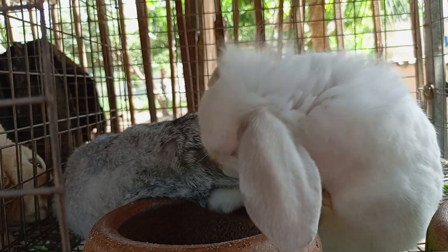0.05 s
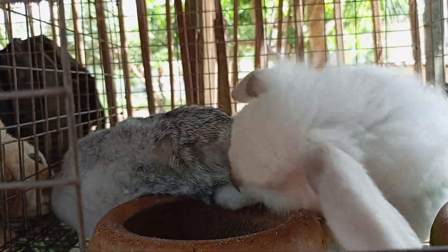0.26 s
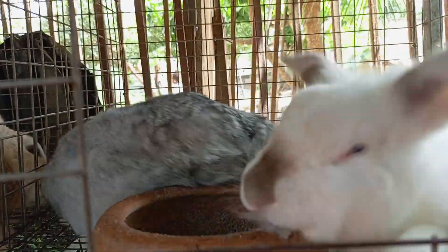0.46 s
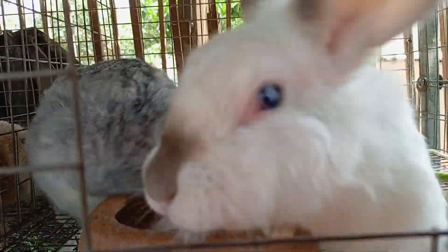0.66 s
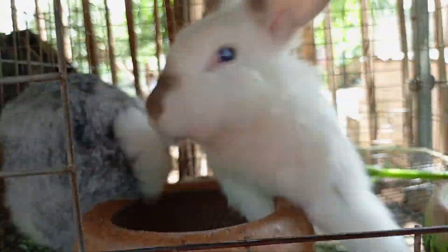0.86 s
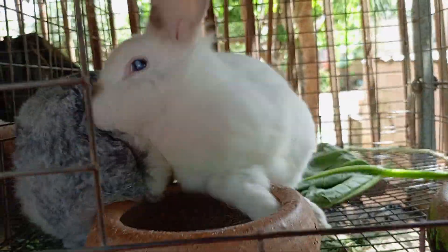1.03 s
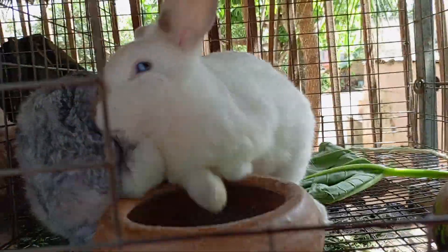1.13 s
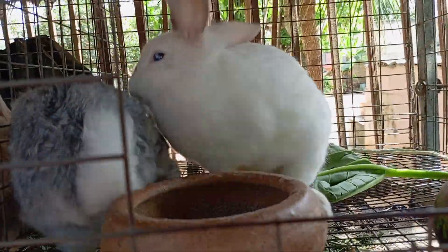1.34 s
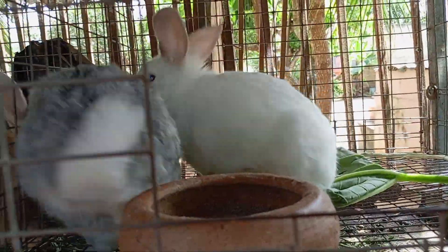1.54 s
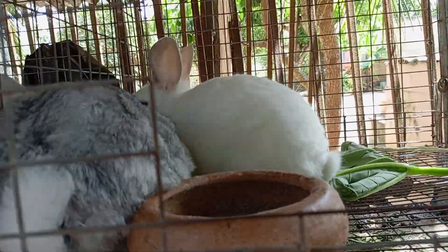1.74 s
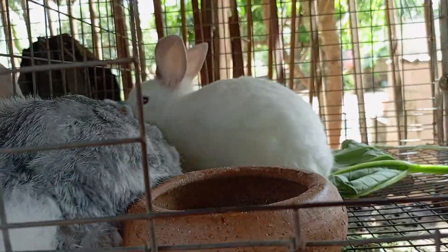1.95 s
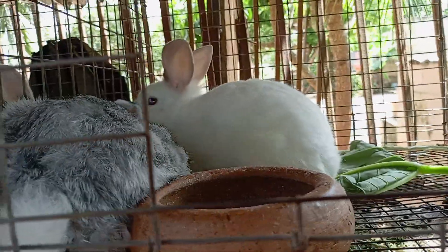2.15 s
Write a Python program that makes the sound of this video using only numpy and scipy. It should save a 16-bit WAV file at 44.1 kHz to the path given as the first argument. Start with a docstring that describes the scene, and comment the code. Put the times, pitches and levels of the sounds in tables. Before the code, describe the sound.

One high, piercing rabbit squeal, followed by faint rustling and rumbling in a cage.

```python
"""A rabbit's single shrill squeal rises, holds and falls away: a harmonic voice, rough at both ends,
with hiss from the narrowed throat. A grunt, pulses filtered by throat resonances, comes just before.
Rabbits are scuffling in a wire cage: friction of fur, paws and claws excites the mesh, and their
shifting weight drives the floor into a rumble. A few soft hoots and a faint whistle sound over a
quiet outdoor background."""
import sys
import numpy as np
from scipy import signal
from scipy.fft import rfft, irfft
from scipy.io import wavfile
from scipy.ndimage import uniform_filter1d

SR = 44100
rng = np.random.default_rng(int(sys.argv[2]) if len(sys.argv) > 2 else 0)


def bounce(signal):
    """Save signal as a 16-bit WAV file at the path given by the first command-line argument."""
    frames = np.transpose(np.atleast_2d(signal))
    limited = np.clip(frames, -1, 1)
    pcm = np.round(limited * 32767).astype(np.int16)
    wavfile.write(sys.argv[1], SR, pcm)


N = 97020
T = np.arange(N) / SR

# fundamental frequency of the squeal (time [s], frequency [Hz])
SQUEAL_PITCH = [(0.184, 1440), (0.192, 1500), (0.196, 1514), (0.206, 2100), (0.212, 2220), (0.232, 2390),
                (0.256, 2450), (0.326, 2941), (0.368, 2737), (0.382, 2776), (0.392, 2756), (0.438, 2786),
                (0.464, 2643), (0.522, 2962), (0.548, 2843), (0.576, 2472), (0.588, 2050), (0.596, 2075)]
# aperiodicity of the voice, capped at 1 in use (time [s], roughness [ratio])
ROUGHNESS = [(.185, 1.1), (.205, 1), (.218, 0.25), (.262, 0), (.28, 0), (.335, 0.07), (.36, 0.04),
             (.435, 0), (.452, .18), (.47, 0), (.505, 0.11), (.535, 0), (.555, .3), (.57, 0.1), (.585, 1.1)]
# envelopes of the first, the second and the upper harmonics (time [s], level [dB])
FUNDAMENTAL_LEVEL = [(0.184, -44), (0.218, -30), (0.254, -26), (0.268, -35), (0.286, -21.5), (0.3, -16),
                     (0.312, -31), (0.326, -18), (0.336, -23.5), (0.38, -18), (0.408, -18.5), (0.494, -11),
                     (0.546, -31.5), (0.552, -21.5), (0.566, -13), (0.584, -29.5), (0.596, -74)]
OCTAVE_LEVEL = [(0.184, -65), (0.214, -30.5), (0.248, -18.5), (0.268, -22), (0.276, -14.5), (0.306, -12),
                (0.372, -34), (0.386, -25), (0.396, -35.5), (0.422, -26), (0.464, -43), (0.5, -16),
                (0.53, -12), (0.54, -33), (0.554, -14), (0.586, -31), (0.596, -49)]
UPPER_LEVEL = [(0.184, -55), (0.206, -26.5), (0.266, -24), (0.282, -34), (0.384, -14.5), (0.408, -26.5),
               (0.418, -15.5), (0.448, -19), (0.458, -29), (0.494, -23), (0.536, -27.5), (0.556, -38),
               (0.568, -19), (0.596, -56.5)]
# harmonics 3 to 7 relative to the upper envelope (gain [dB])
UPPER_OFFSETS = [-2, -15.5, -33.5, -30, -42]
# vocal strain brightens harmonics 4 to 7 (time [s], gain [dB])
STRAIN = [(.19, -12), (.215, -7), (.26, 4.5), (.3, 2), (.35, -4.5), (.44, 3.5), (.48, 2), (.53, 7),
          (.56, -4), (.59, -6)]
# a second, slower vibration that adds sidebands (time [s], rate [Hz], depth [dB])
FLUTTER = [(.36, 920, -51.5), (.388, 720, -29.5), (.405, 520, -25.5), (.43, 440, -27.5), (.45, 420, -45)]
# period doubling: modulation at half the fundamental (time [s], depth [dB])
DOUBLING = [(.185, -8.5), (.205, -21), (.235, -16.5), (.255, -29.5), (.27, -47.5)]
# brief catches of the voice (time [s], duration [s], gain [dB])
CATCHES = [(.263, 0.0081, -10.5), (0.503, 0.013, -7.5), (0.55, 0.0043, 0.5), (0.568, 0.0085, -6)]
def squeal():
    """A harmonic series; modulation adds sidebands, and period doubling adds half harmonics."""
    jitter_depth, shimmer_db, rough_hz = .013, 4.5, 260
    waver_db, waver_hz = 3.0, 75
    pitch = uniform_filter1d(curve(SQUEAL_PITCH), size=220)  # smoothed over 5 ms
    rough = np.clip(curve(ROUGHNESS), 0, 1)
    phase = phase_of(pitch * (1 + jitter_depth * rough * drift(rough_hz)))
    levels = [curve(FUNDAMENTAL_LEVEL), curve(OCTAVE_LEVEL)]
    for k, offset in enumerate(UPPER_OFFSETS, 3):
        strain = curve(STRAIN) if k > 3 else 0
        levels.append(curve(UPPER_LEVEL) + offset + strain + waver_db * drift(waver_hz))
    flutter_hz, flutter_db = curve(FLUTTER), curve(FLUTTER, column=2)
    flutter = from_db(flutter_db) * during(FLUTTER) * np.cos(phase_of(flutter_hz))
    tone = 0
    for k, db in enumerate(levels, 1):
        shimmer = shimmer_db * rough * drift(rough_hz)
        tone += from_db(db + shimmer) * np.sin(k * (phase + flutter))
    tone *= from_db(sum(db * swell(start, length) for start, length, db in CATCHES))
    doubling = from_db(curve(DOUBLING)) * during(DOUBLING) * np.cos(phase / 2)
    voice = np.sqrt(2) * tone * (1 + flutter + doubling) * gate(start=.183, end=.598, edge=.0052)
    throat_low_cut = signal.butter(4, 1590, "high", fs=SR, output="sos")
    return signal.sosfilt(throat_low_cut, voice)


# envelope of the airflow noise (time [s], level [dB])
AIR_LEVEL = [(.18, -49.5), (.21, -47.5), (.25, -49.5), (.28, -38.5), (.33, -42.5), (.37, -52), (.42, -44.5),
             (.455, -36), (.48, -42), (.51, -38), (.54, -41), (.555, -43), (.585, -42.5), (.62, -42)]
# its spectrum (frequency [Hz], gain [dB])
AIR_SPECTRUM = [(300, -31.5), (1500, -31), (2250, -26), (3000, -5.5), (4200, 1), (6500, 2), (8500, -7),
                (11000, -11.5), (12800, -20), (15000, -7.5)]
# raspy cracks in the cry (time [s], duration [s], level [dB])
RASPS = [(0.436, 0.022, -37), (0.49, 0.013, -42), (0.497, 0.024, -30), (0.548, 0.016, -27),
         (.575, 0.014, -40)]
def squeal_air():
    """Turbulence in the narrowed throat: a hiss and short raspy cracks, added in power."""
    steady = from_db(curve(AIR_LEVEL)) * during(AIR_LEVEL)
    cracks = sum(from_db(db) * swell(start, length) for start, length, db in RASPS)
    turbulence = noise() * from_db(2 * drift(rate_hz=400))
    return coloured(turbulence, AIR_SPECTRUM) * np.hypot(steady, cracks)


# course of the grunt (time [s], frequency [Hz], level [dB])
GRUNT_CONTOUR = [(.045, 189.9, -59), (.068, 194.2, -50), (.097, 203.6, -46), (.102, 204.4, -36),
                 (.113, 222, -42.5), (.135, 245.8, -32), (.157, 269.3, -32), (.175, 291, -36.5),
                 (.195, 270, -60.5)]
# spectrum of its rasp (frequency [Hz], gain [dB])
GRUNT_RASP_SPECTRUM = [(150, -15.5), (300, -2), (500, -6.5), (800, 0.5), (8000, 0.5)]
# throat resonances (frequency [Hz], bandwidth [Hz], gain [dB])
FORMANTS = [(222.2, 55, 0.5), (385.5, 130, -7.5), (542, 182, 5), (738.5, 199, 2), (980, 220, -9.5),
            (1690, 260, -24), (3647, 1500, -26)]
def grunt():
    """Source and filter: uneven low pulses and noise excite the resonances of the throat."""
    jitter_depth, rasp_gain = .06, 1.1
    pitch, db = curve(GRUNT_CONTOUR), curve(GRUNT_CONTOUR, column=2)
    cycles = np.cumsum(pitch * (1 + jitter_depth * drift(rate_hz=100))) / SR
    pulses = unit_power(np.diff(np.floor(cycles), prepend=0))  # one pulse a cycle
    rasp = rasp_gain * coloured(noise(), GRUNT_RASP_SPECTRUM)
    return resonate(pulses + rasp, FORMANTS) * from_db(db) * during(GRUNT_CONTOUR)


# strokes of fur and paws (time [s], attack [s], decay [s], level [dB])
BRUSH_STROKES = [(.0, .03, 0.12, -58), (.11, 0.093, 0.023, -50), (.59, 0.047, 0.064, -40),
                 (.775, 0.019, 0.14, -46.5), (1.014, 0.0056, 0.062, -51), (1.063, 0.023, 0.019, -45.5),
                 (1.11, 0.0056, 0.067, -54.5), (1.25, .02, .06, -58.5), (1.33, 0.0078, 0.05, -49),
                 (1.451, 0.034, .07, -51.5), (1.59, 0.024, 0.059, -46.5), (1.75, 0.034, 0.16, -56.5),
                 (1.868, 0.016, 0.032, -48.5), (2.12, .02, 0.019, -68)]
# spectrum of their friction (frequency [Hz], gain [dB])
BRUSH_SPECTRUM = [(300, -15), (1000, -6), (2000, -18.5), (3000, -6), (4300, -4.5), (5200, -12), (6400, -3),
                  (8200, -8), (10800, -11.5), (12800, -24), (15000, -11)]
# modes of the mesh (frequency [Hz], bandwidth [Hz], gain [dB])
WIRE_MODES = [(4080, 260, -5.5), (5950, 100, 1.5), (6360, 140, -3.5), (7050, 150, -4), (10100, 140, -11.5)]
def brushes():
    """Sliding friction of fur and paws, with the ringing of randomly excited wire modes."""
    rustle = coloured(friction(), BRUSH_SPECTRUM)
    wires = from_db(-3.5) * resonate(noise(), WIRE_MODES)
    return stroke_envelope(BRUSH_STROKES) * unit_power(rustle + wires)


# scrapes and ticks of claws (time [s], attack [s], decay [s], level [dB])
CLAW_STROKES = [(.1, 0.00092, 0.0015, -48.5), (.137, .001, .005, -52), (.158, .007, 0.018, -36),
                (.62, 0.024, 0.034, -42.5), (.99, 0.00067, 0.0091, -60), (1.113, .003, 0.038, -50),
                (1.333, 0.0051, 0.031, -64), (1.593, 0.0027, 0.014, -46)]
# their spectrum (frequency [Hz], gain [dB])
CLAW_SPECTRUM = [(1500, -3), (4500, -12.5), (6200, 5.5), (7300, 2.5), (8300, -7.5), (10500, 3.5),
                 (12500, -21.5), (15000, -12)]
def scrapes():
    """Friction transients: claws catch on the wire in bright bursts of noise."""
    return stroke_envelope(CLAW_STROKES) * coloured(friction(), CLAW_SPECTRUM)


# envelope of bodies shoving together (time [s], level [dB])
SHOVE_LEVEL = [(0, -66), (.3, -70), (.42, -65), (.46, -58), (.54, -65.5), (.575, -44.5), (.64, -39.5),
               (.72, -46.5), (.83, -44), (.92, -50), (1.08, -52), (1.22, -52), (1.42, -57.5), (1.58, -61.5),
               (1.615, -45.5), (1.69, -48), (1.75, -53), (1.83, -57.5), (1.9, -58), (2.0, -63.5),
               (2.2, -64.5)]
# spectrum of their rubbing (frequency [Hz], gain [dB])
SHOVE_SPECTRUM = [(30, -36), (100, -9.5), (250, 0.5), (500, 0.5), (800, -7), (1300, -7), (2500, -15),
                  (5000, -19.5), (12000, -41)]
def shoving():
    """Friction of fur on fur: dull noise whose level flickers by about 1 dB."""
    return coloured(noise(), SHOVE_SPECTRUM) * from_db(curve(SHOVE_LEVEL) + drift(rate_hz=34))


# envelope of the floor's vibration (time [s], level [dB])
RUMBLE_LEVEL = [(0, -56), (.3, -64), (.54, -73), (.58, -44.5), (.64, -38.5), (.72, -41), (.79, -43.5),
                (.92, -45), (1.0, -48.5), (1.1, -46.5), (1.24, -59.5), (1.38, -53), (1.58, -60),
                (1.69, -47.5), (1.76, -46.5), (1.82, -55), (1.9, -51.5), (1.98, -56.5), (2.2, -60)]
# spectrum of its broadband part (frequency [Hz], gain [dB])
RUMBLE_SPECTRUM = [(20, -44.5), (35, -29), (52, -21.5), (85, 6.5), (125, 3.5), (160, -2.5), (250, 3.5),
                   (400, -6), (900, -41.5)]
# modes of the cage floor (frequency [Hz], bandwidth [Hz], gain [dB])
FLOOR_MODES = [(123.5, 11, 0), (230.6, 14, -3.5)]
def floor_rumble():
    """Forced vibration: shifting weight shakes the cage floor, which rings in two low modes."""
    push = coloured(noise(), RUMBLE_SPECTRUM)
    ring = from_db(0.5) * resonate(noise(), FLOOR_MODES)
    return unit_power(push + ring) * from_db(curve(RUMBLE_LEVEL))


# soft hoots (time [s], duration [s], frequency [Hz], level [dB])
HOOT_NOTES = [(0.052, 0.053, 262, -45.5), (0.231, 0.023, 257, -48.5), (0.944, 0.055, 285, -52.5),
              (1.123, 0.056, 290, -52.5), (1.283, 0.027, 292, -50), (1.444, 0.041, 292.6, -47)]
# spectral envelope of their harmonics (frequency [Hz], gain [dB])
HOOT_SPECTRUM = [(260, -15.5), (520, -14), (580, 1), (780, 2), (880, 0.5), (1150, -21.5), (1500, -22.5),
                 (2500, -50)]
def hoots():
    """Harmonic notes, strongest in the second and third partials; frequency jitter makes them hoarse."""
    jitter = 1 + 0.031 * drift(rate_hz=120)
    spectrum_hz, spectrum_db = np.transpose(HOOT_SPECTRUM)
    out = 0
    for start, length, hz, db in HOOT_NOTES:
        phase = phase_of(hz * jitter)
        gains = from_db(np.interp(hz * np.arange(1, 6), spectrum_hz, spectrum_db))
        note = unit_power(sum(gain * np.sin(k * phase) for k, gain in enumerate(gains, 1)))
        out += from_db(db) * note * gate(start, start + length, edge=length / 3)
    return out


# squeaky rubs (time [s], duration [s], frequency [Hz], level [dB])
PAW_RUBS = [(0.747, 0.03, 1280, -46.5), (0.78, 0.084, 1260, -48.5), (0.82, 0.023, 1650, -49.5),
            (1.862, 0.068, 4250, -57), (2.115, .05, 2800, -63.5)]
def rubs():
    """Resonance driven by friction: a paw on something hard excites one narrow band of noise."""
    width_hz = 133
    return sum(from_db(db) * swell(start, length) * resonate(noise(), [(hz, width_hz, 0)])
               for start, length, hz, db in PAW_RUBS)


# plucks of single wires (time [s], frequency [Hz], level [dB], time to fall 60 dB [s])
WIRE_PLUCKS = [(.991, 11100, -52.5, 0.1), (1.447, 9850, -60, 0.15), (1.882, 6150, -53.5, 0.26)]
def pings():
    """Damped free vibration: each plucked wire rings as an exponentially decaying sinusoid."""
    out = 0
    for start, hz, db, t60 in WIRE_PLUCKS:
        age = np.maximum(T - start, 0)
        out += from_db(db - 60 * age / t60) * np.sin(2 * np.pi * hz * age)
    return out


# thin whistle that starts ahead of the grunt (time [s], frequency [Hz], level [dB])
WHISTLE_CONTOUR = [(.025, 5170, -85.5), (.055, 5550, -54), (.08, 5150, -69.5), (.105, 4914, -61.5)]
def whistle():
    """Frequency modulation of a pure tone: one faint, arching chirp."""
    hz, db = curve(WHISTLE_CONTOUR), curve(WHISTLE_CONTOUR, column=2)
    return from_db(db) * np.sin(phase_of(hz)) * during(WHISTLE_CONTOUR)


# echoes from nearby surfaces (delay [s], gain [dB])
REFLECTIONS = [(.0031, -29.5), (.0074, -19), (0.0129, -21)]
def reverberate(x):
    """Reverberation: direct sound, early reflections and a weak, exponentially decaying tail."""
    t60_s, tail_db = 0.4, -21
    t = T[:SR // 2]
    tail = rng.standard_normal(len(t)) * from_db(-60 * t / t60_s)
    early = sum(from_db(db) * np.interp(T - delay, T, x) for delay, db in REFLECTIONS)
    late = signal.fftconvolve(x, tail / np.linalg.norm(tail))[:N]
    return x + early + from_db(tail_db) * late


# spectrum of the outdoor background (frequency [Hz], gain [dB])
OUTDOOR_SPECTRUM = [(20, -25), (50, -1), (100, 5), (300, -3), (700, -17.5), (2000, -23.5), (4500, -20),
                    (6300, -19), (9000, -28.5), (13000, -35.5), (15000, -31)]
def background():
    """Stationary noise, quiet and strongest at low frequencies."""
    return from_db(-62) * coloured(noise(), OUTDOOR_SPECTRUM)


def friction():
    """Friction noise: a steady hiss plus sparse random impulses that crackle."""
    grains_per_s, grain_gain = 580, 0.32
    grains = unit_power((rng.random(N) < grains_per_s / SR) * noise())
    return noise() + grain_gain * grains


def stroke_envelope(rows):
    """Incoherent strokes add in power; each rises linearly and decays exponentially."""
    power = 0
    for start, attack, decay, db in rows:
        rise = np.clip((T - start) / attack, 0, 1)
        fall = np.exp(-np.maximum(T - start - attack, 0) / decay)
        power += (from_db(db) * rise * fall) ** 2
    return np.sqrt(power)


def resonate(x, modes):
    """Modal superposition: two-pole resonators summed with alternating signs, at unit power."""
    out = 0
    for k, (hz, width, db) in enumerate(modes):
        radius = np.exp(-np.pi * width / SR)
        b = (1 - radius ** 2) / 2 * np.array([1, 0, -1])
        a = [1, -2 * radius * np.cos(2 * np.pi * hz / SR), radius ** 2]
        out += (-1) ** k * from_db(db) * signal.lfilter(b, a, x)
    return unit_power(out)


def coloured(x, spectrum):
    """Spectral shaping by gains interpolated over log frequency, at unit power."""
    hz, db = np.transpose(spectrum)
    bin_hz = np.maximum(np.arange(N // 2 + 1) * SR / N, 1)
    gain = from_db(np.interp(np.log(bin_hz), np.log(hz), db))
    return unit_power(irfft(rfft(x) * gain, N))


def drift(rate_hz):
    """Random fluctuation: low-passed noise at unit power."""
    pole = np.exp(-2 * np.pi * rate_hz / SR)
    smooth = signal.lfilter([1], [1, -2 * pole, pole ** 2], rng.standard_normal(N + SR))
    return unit_power(smooth[SR:])


def noise():
    """White Gaussian noise."""
    return rng.standard_normal(N)


def phase_of(hz):
    """Phase as the time integral of frequency."""
    return 2 * np.pi * np.cumsum(hz) / SR


def curve(rows, column=1):
    """Linear interpolation of one table column over time."""
    points = np.transpose(rows)
    return np.interp(T, points[0], points[column])


def gate(start, end, edge):
    """A window with raised-cosine edges; times in seconds."""
    return np.sin(np.pi / 2 * np.clip(np.minimum(T - start, end - T) / edge, 0, 1)) ** 2


def swell(start, length):
    """A raised-cosine pulse."""
    return gate(start, start + length, edge=length / 2)


def during(rows):
    """A window over the time span of a table."""
    return gate(rows[0][0], rows[-1][0], edge=.005)


def from_db(db):
    """Decibels to amplitude ratio."""
    return 10 ** (np.asarray(db) / 20)


def unit_power(x):
    """Normalisation to a mean square of one."""
    return x / np.sqrt(np.mean(x ** 2) + 1e-20)


def scene():
    """Superposition of reverberant calls, scuffling and background in one channel."""
    calls = reverberate(squeal() + squeal_air() + grunt() + hoots() + whistle())
    outdoors = background()
    scuffle = brushes() + scrapes() + shoving() + floor_rumble() + rubs() + pings()
    return (calls + scuffle + outdoors)[None]


def record(dry):
    """Band limiting: a steep elliptic low-pass removes the highest treble."""
    cutoff_hz = 15800
    return signal.sosfilt(signal.ellip(12, .1, 80, cutoff_hz, fs=SR, output="sos"), dry)


dry = scene()
out = record(dry)
bounce(out)
```